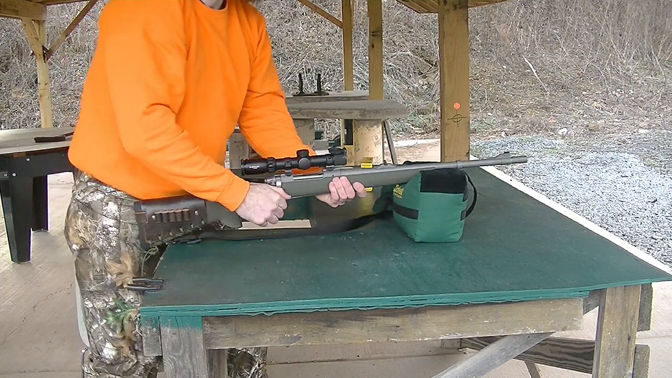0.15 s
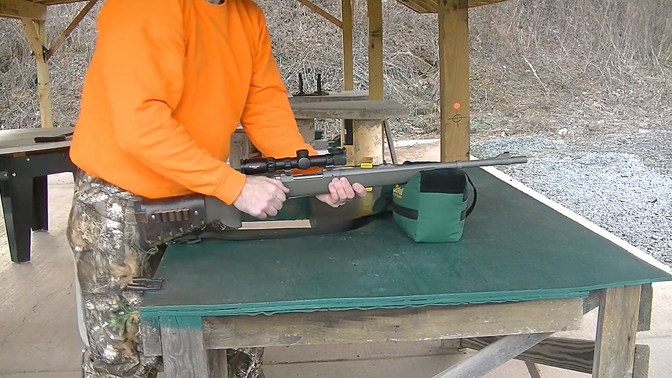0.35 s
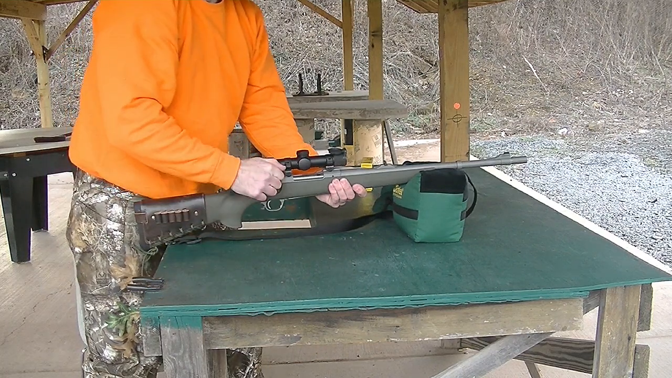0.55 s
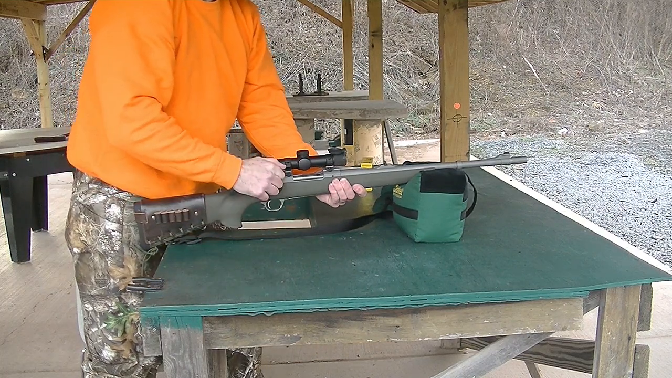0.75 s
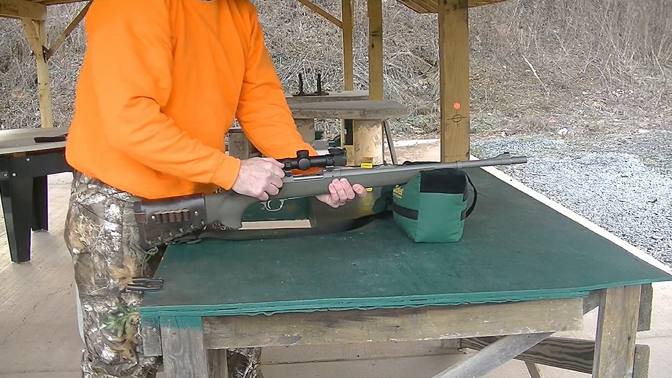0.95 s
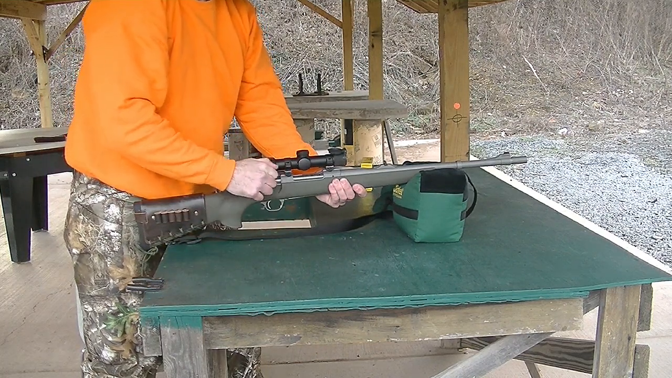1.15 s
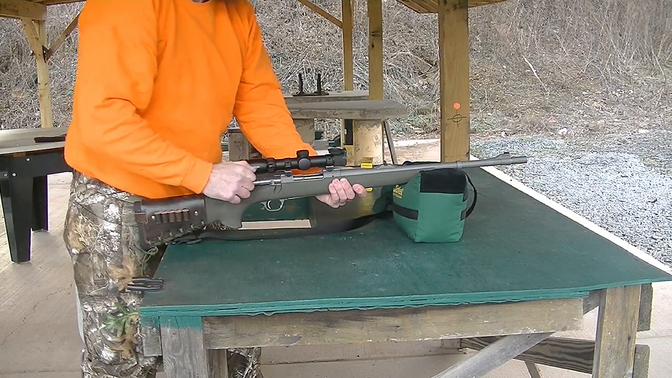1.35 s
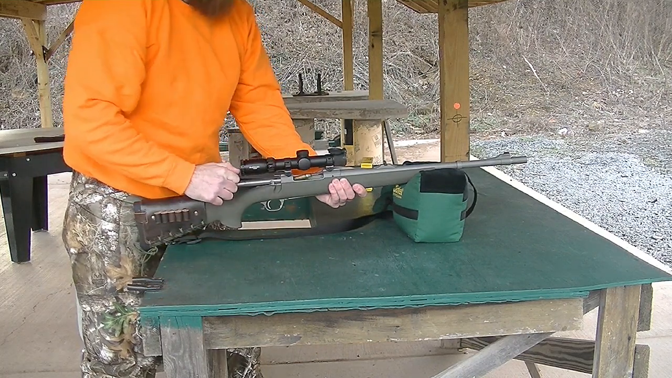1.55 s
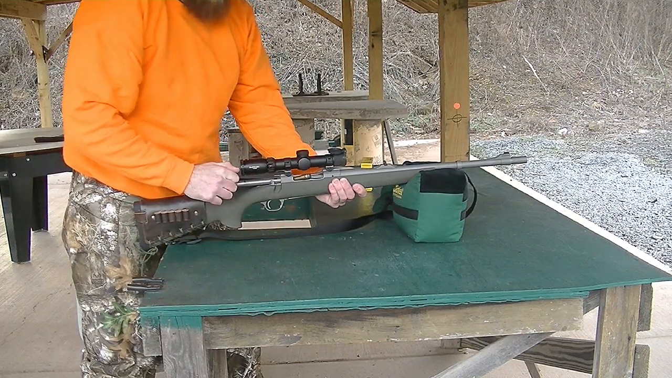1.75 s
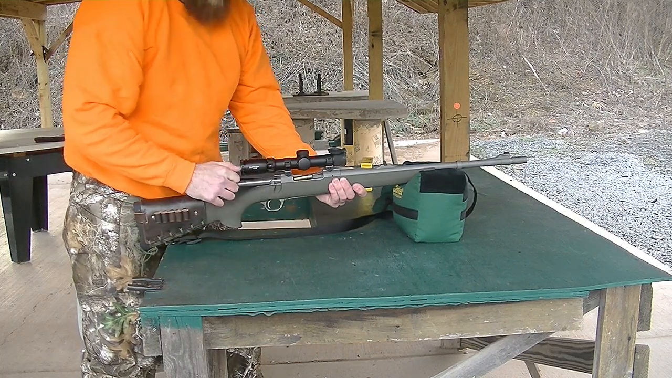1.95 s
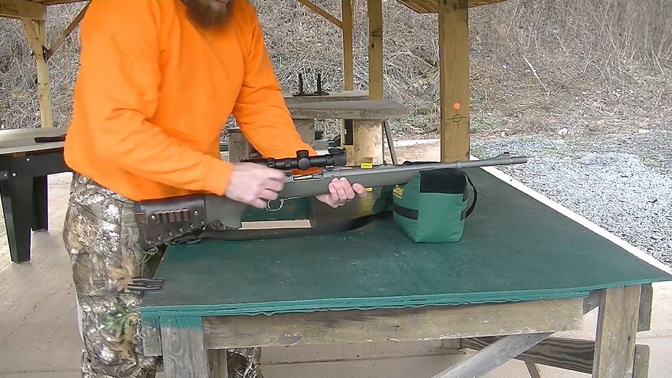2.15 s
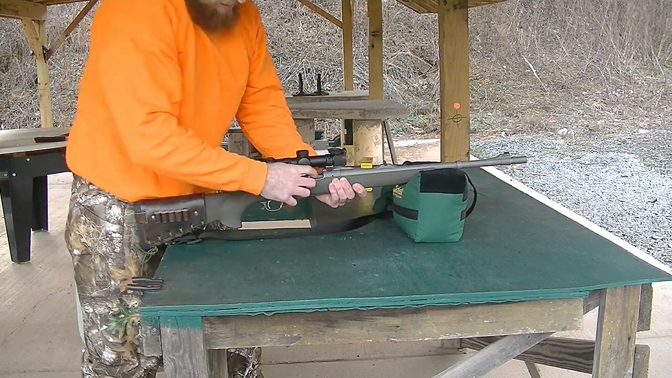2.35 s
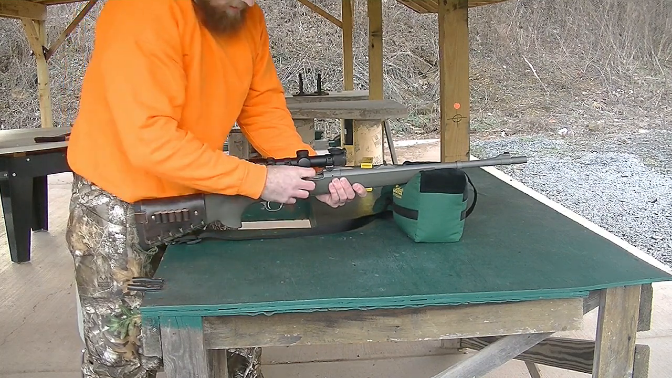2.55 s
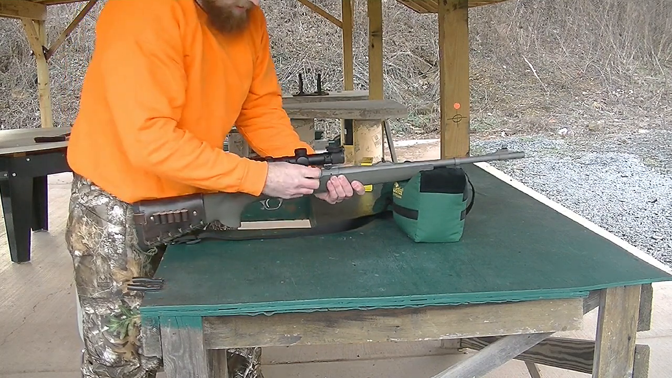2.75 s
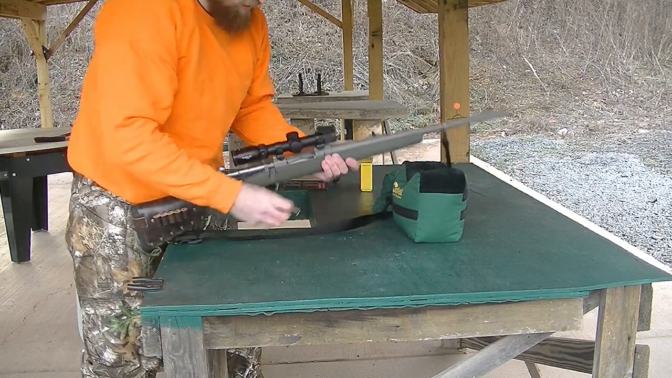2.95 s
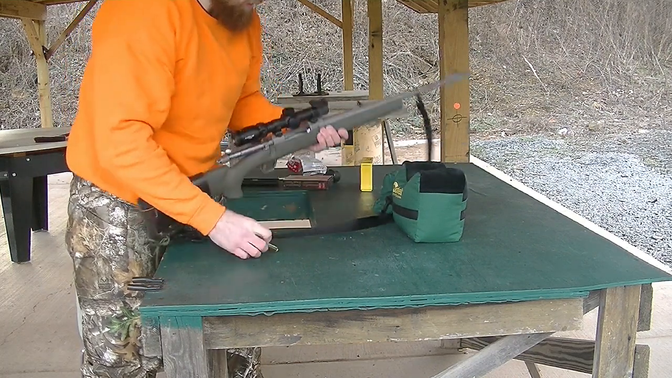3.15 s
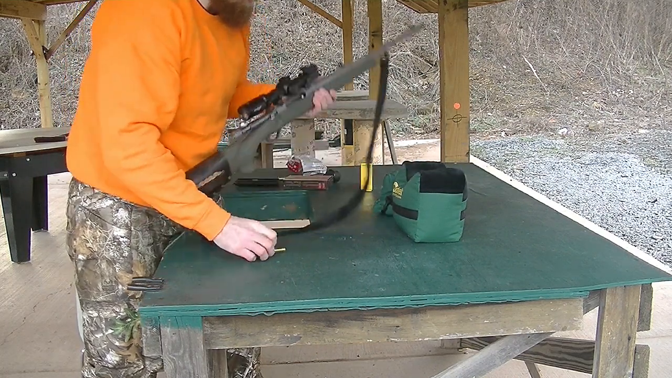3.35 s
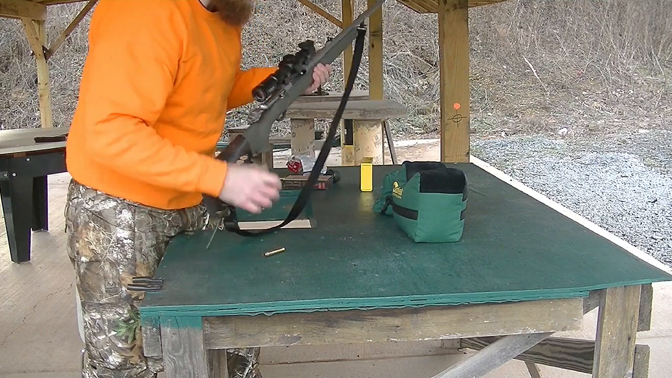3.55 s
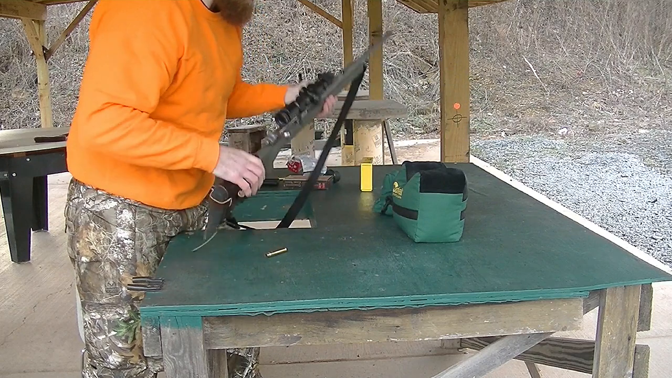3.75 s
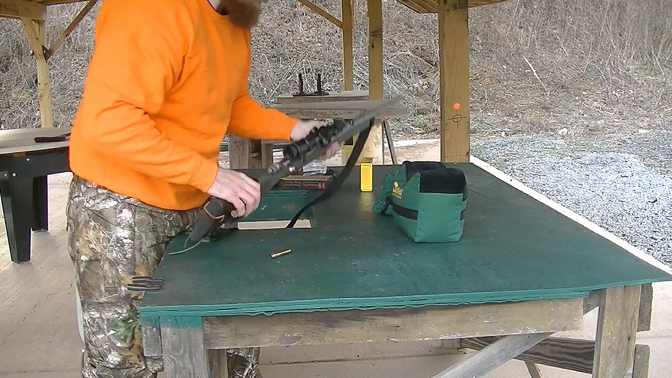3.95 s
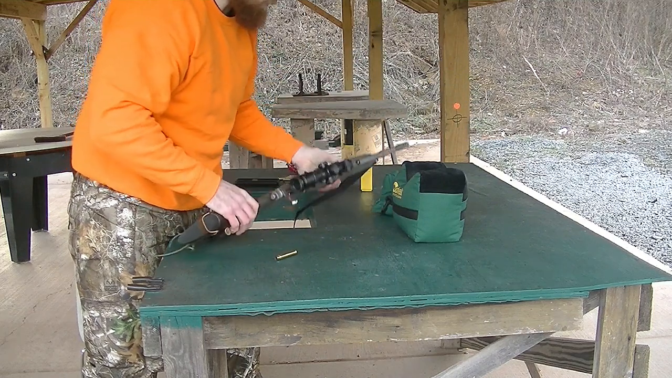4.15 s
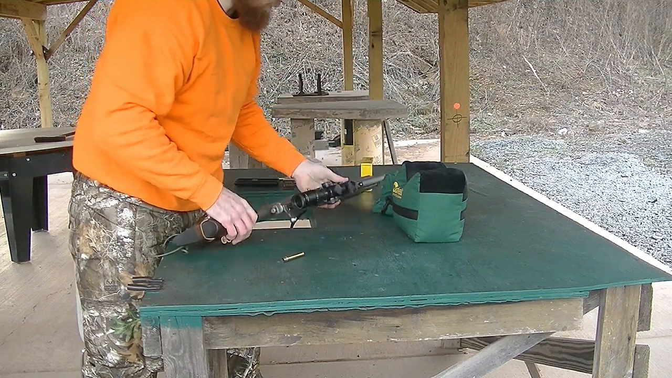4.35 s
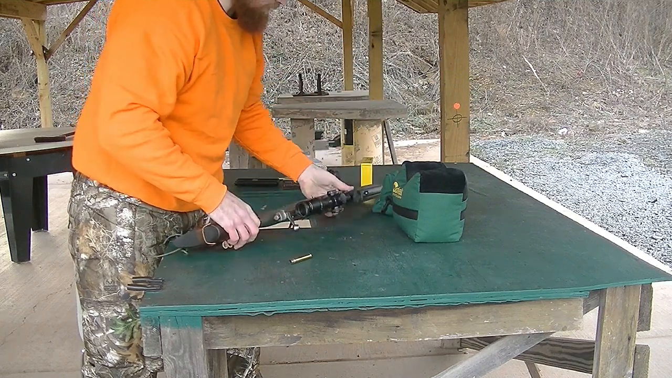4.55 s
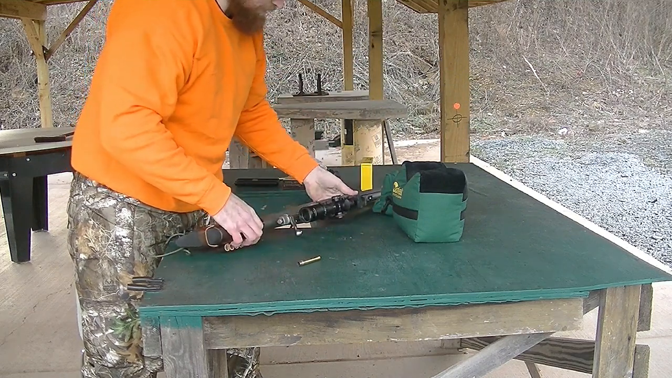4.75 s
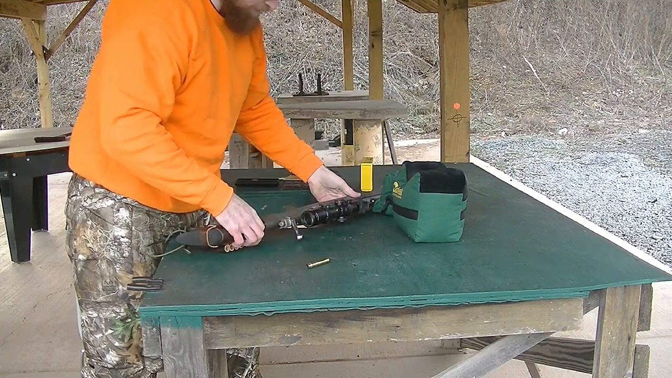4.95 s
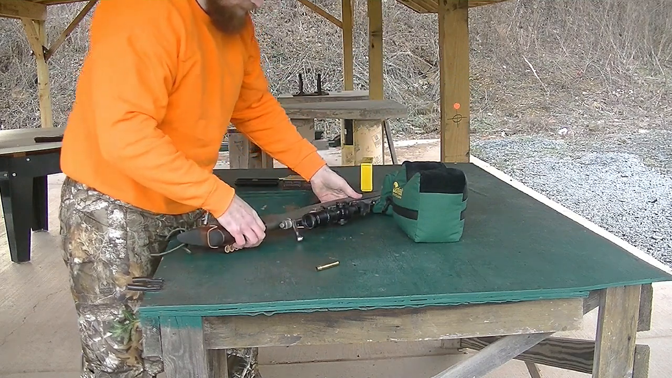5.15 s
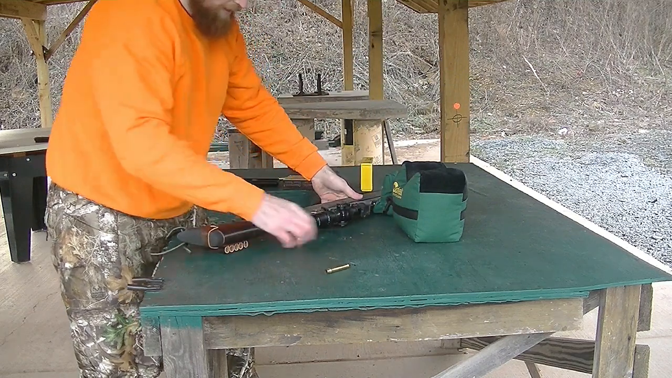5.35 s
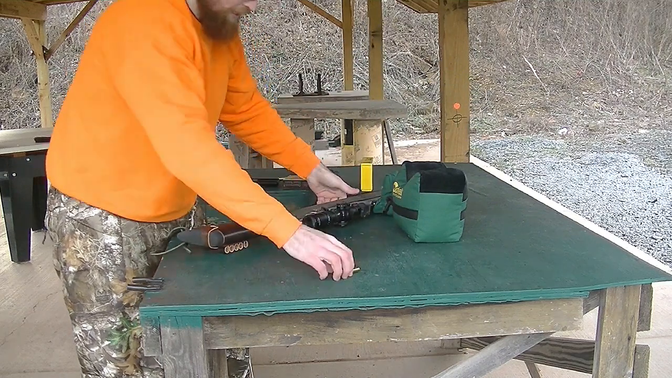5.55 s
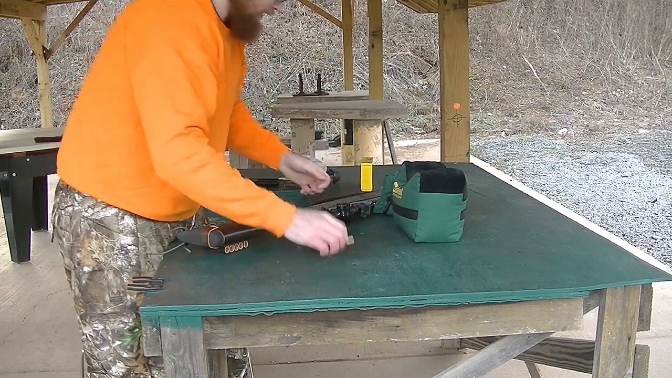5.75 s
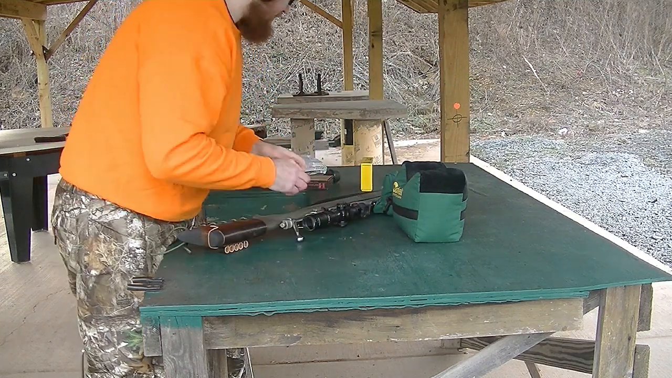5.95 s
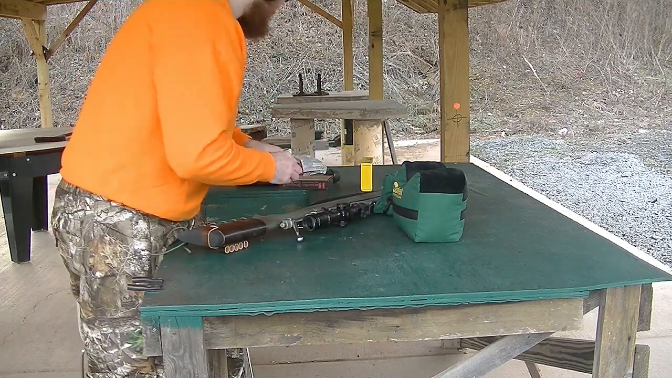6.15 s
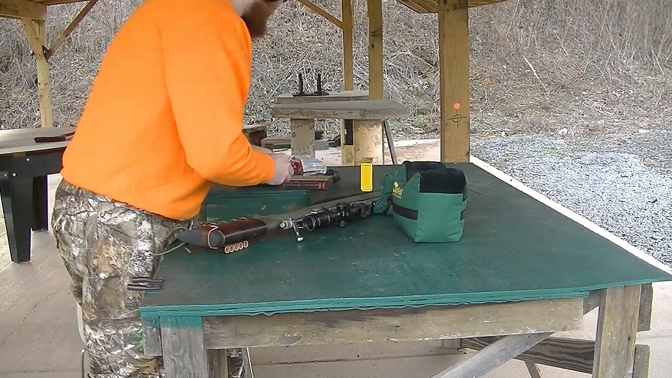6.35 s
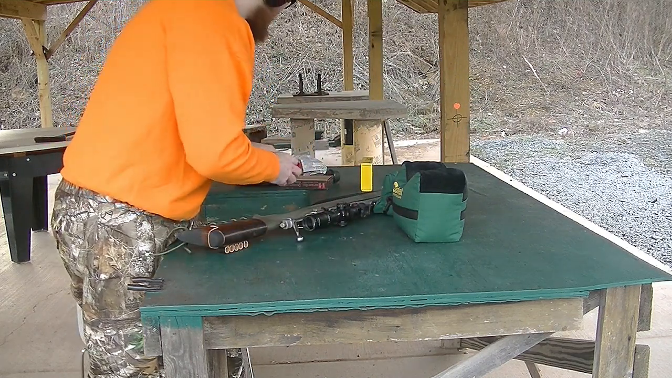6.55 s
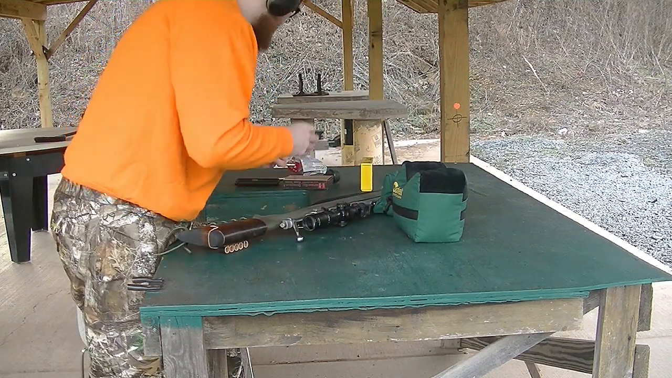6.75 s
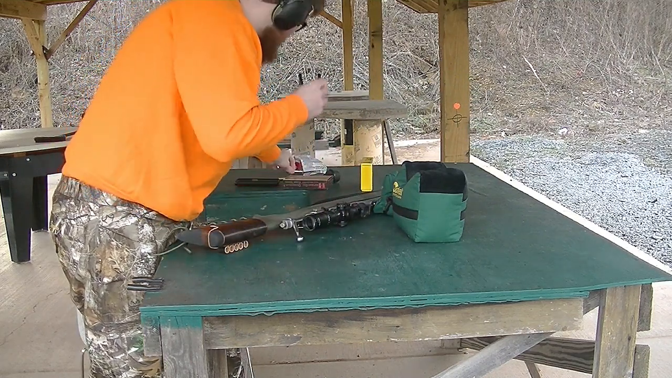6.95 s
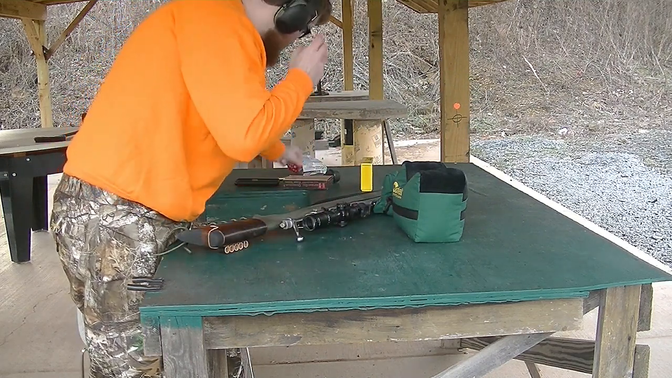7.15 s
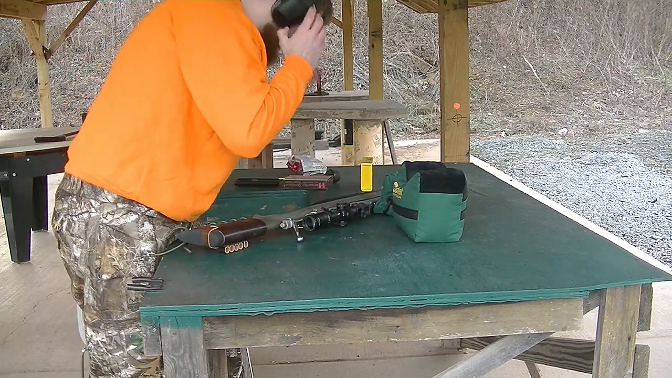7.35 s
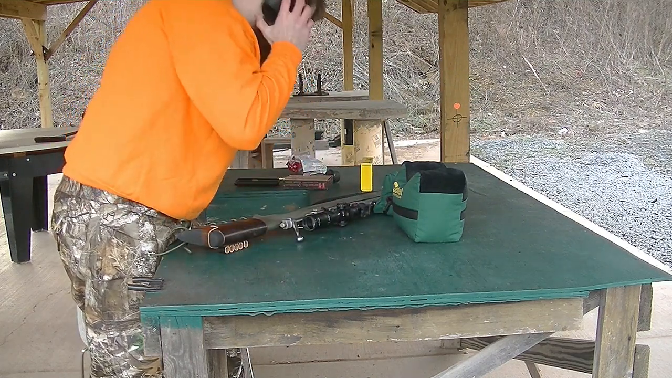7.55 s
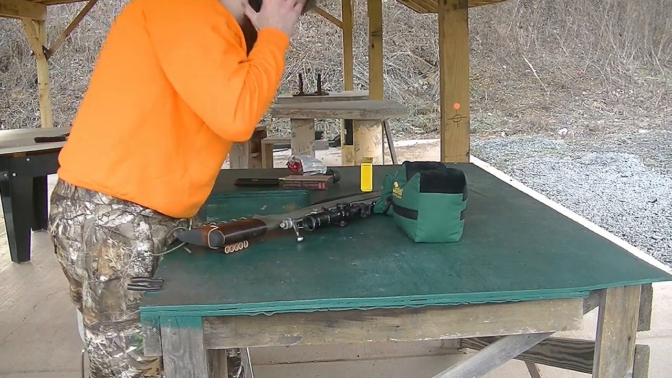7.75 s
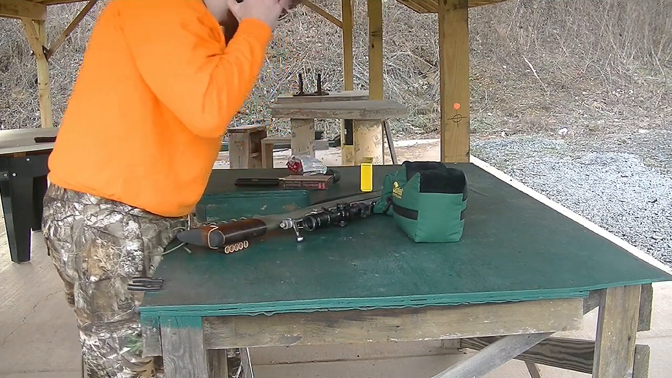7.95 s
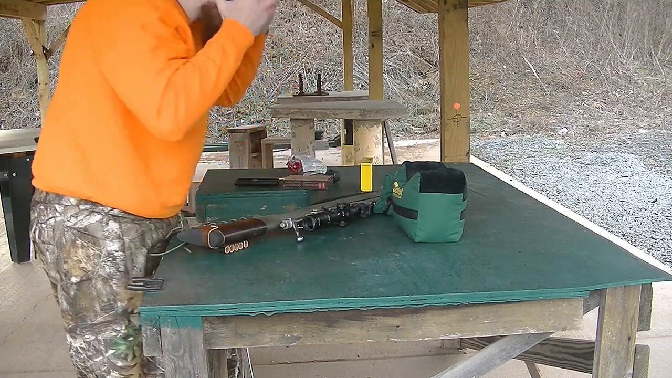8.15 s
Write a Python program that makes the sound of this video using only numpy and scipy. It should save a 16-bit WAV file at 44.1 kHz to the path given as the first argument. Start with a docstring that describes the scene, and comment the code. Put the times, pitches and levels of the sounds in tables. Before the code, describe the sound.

A wide, soft outdoor wash with microphone hiss runs throughout. From 0 to 0.8 s a camera lens motor purrs faintly in quick steps with light cloth rubbing, while small metallic ticks lead to a hard, bright double steel clack at about 0.55 s. Quiet sliding and a duller clink near 1.28 s precede a second sharp clack at 1.62-1.67 s, with thin high metal rings and a short shelter echo. Lighter clicks come at 2.6 and 2.76 s. A brass case taps the wooden bench at 3.25 s; dry knocks, strap ticks and fabric rubs continue to 4.6 s, with more handling around 5.3-5.8 s. The lens purrs again near 3.6, 4.9 and 6.4 s, the last two preceded by a small click. At 7.14 s a farther rifle-like crack slaps and echoes, fading into air and a faint rub from 8 s.

```python
"""Cloth rubs softly and a camera's lens motor purrs; then steel clacks as a bolt-action rifle is cycled,
unloaded and laid on a wooden bench under a shooting range's roof. Late on, a crack like a small rifle slaps back.
Blows are impulses with chatter, filtered by the struck body and followed by random echo; fine high rings are
decaying sines, rubs are filtered grains, the lens steps in short tone bursts, and the air is filtered noise."""
import sys
import numpy as np
from scipy import signal
from scipy.fft import rfft, irfft, next_fast_len
from scipy.io import wavfile

SR = 44100
rng = np.random.default_rng(int(sys.argv[2]) if len(sys.argv) > 2 else 0)


def wrap_up_sound(samples):
    """Save the sound to the file named by the first command line argument, as 16-bit audio."""
    columns = np.atleast_2d(samples).T
    # keep every value between -1 and 1, then stretch to whole-number steps
    tamed = np.clip(columns, -1, 1)
    steps = np.round(tamed * 32767).astype(np.int16)
    wavfile.write(sys.argv[1], SR, steps)


N = 365656

# Steel strikes steel as the bolt is worked: start_s, level_db (over 3 ms), weight_db (below 2 kHz),
# part_hz (main resonance of the struck part), ring_db (relative to the blow)
STEEL_BLOWS = [(0.157, -45.5, -6, 2500, -20), (0.333, -43, 0, 2400, -20), (.374, -41, 2, 3250, -22),
               (.463, -27.5, -3.5, 4370, -25), (0.5383, -17.5, -2, 5950, -20), (0.547, -16, 2, 3900, -22),
               (0.5571, -11.5, 4, 3400, -16), (1.2212, -44.5, 9, 1490, -20), (1.2754, -31, 7, 1020, -8),
               (1.4826, -46, -3, 7000, -20), (1.6095, -29, -4, 5420, -27), (1.6203, -29, -4, 5400, -10),
               (1.6354, -27.5, -11, 5030, -17), (1.6425, -18.5, -19, 3400, 1),
               (1.6663, -16, -0.5, 3300, -22), (1.6697, -10.5, -3, 3400, -12), (1.9204, -41.5, 1, 3300, -4),
               (2.049, -39, -1.5, 1580, -20), (2.5868, -40, 4, 2690, -20), (2.6043, -36, -8, 3800, -11),
               (2.6265, -26, -3.5, 5500, -22), (2.7594, -25, 6, 2480, -13)]
HARD_DB, EDGE_PER_DB = -18.5, 0.36  # blows above this level gain treble, those below lose it, dB per dB
REBOUND_S, REBOUND_SPREAD, REBOUND_DB = .0075, .25, -8.5  # gap, its scatter as a share, change per bounce


def contacts(count=3):
    """Inelastic rebound: each blow repeats more weakly, and a harder contact is briefer and so brighter."""
    for s, db, weight_db, part_hz, _ in STEEL_BLOWS:
        gaps = REBOUND_S * (1 + REBOUND_SPREAD * rng.uniform(-1, 1, count))
        for k in range(count):
            level_db = db + k * REBOUND_DB
            edge_db = EDGE_PER_DB * (level_db - HARD_DB)
            yield s + gaps[:k].sum(), level_db, weight_db, edge_db, part_hz


# Spectral colour of the struck action: frequency_hz, density_db (per Hz)
ACTION_COLOUR = [(120, -66.5), (200, -36), (719, -25), (1100, -4), (1270, -9), (1580, -4), (2590, -4),
                 (2780, -5), (3730, -2.5), (4080, -3), (6110, -6), (7070, -11.5), (9300, -16.5),
                 (14200, -17), (15800, -31)]
# Broad resonances of the receiver: centre_hz, width_hz, level_db
RECEIVER_MODES = [(1167, 86, 1), (1680, 200, 0), (2865, 76, 5), (3820, 200, 3), (5480, 200, 0),
                  (6950, 470, 5.5)]


def receiver_colour(hz):
    """Body resonance: the receiver's broad peaks stand on the colour of the action."""
    return read(ACTION_COLOUR, hz) + bumps(RECEIVER_MODES, hz)


def action():
    """Impact excitation: bolt handle, lugs and catches strike the receiver."""
    return blows(contacts(), receiver_colour, chatter_s=0.0028, chatter_db=19, part_db=6.0,
                 wet_db=-3.5, t60_factor=1.066, early_s=0.017, early_db=2.5)


# Fine ringing modes, thin high tones after sharp sounds: mode_hz, level_db, t60_s
FINE_MODES = [(1105, -9, .16), (1660, -5, .27), (1950, -8, .25), (2853, -11, .23), (3130, -13, .25),
              (3330, 0, .055), (3575, -12, .22), (3720, -12, .22), (5322, -3, .33), (6870, -11, .35),
              (8150, -12, .3), (10258, -9, .22), (13643, -10, .24)]
# Thin rings heard on their own: start_s, level_db, centre_hz
LONE_PINGS = [(1.367, -37.5, 8150), (1.644, -19, 13640), (1.722, -25, 10255), (1.847, -41.5, 1690),
              (2.76, -35, 10255), (3.482, -44.5, 5325), (5.36, -35, 3580), (5.64, -50.5, 5325),
              (7.148, -29.5, 10000), (7.305, -50, 5325)]
RING_OCTAVES, RING_SPILL_DB = 0.49, -11.5  # spread about the blow's resonance, least share for every mode
PING_OCTAVES = .09


def fine_ring(rise_s=.0008, size=12288):
    """Modal synthesis: decaying sines waver at random; modes near each sound's centre pitch ring most."""
    out, t = np.zeros(N), np.arange(size) / SR
    struck = [(s, db + ring_db, part_hz, RING_OCTAVES, gain_of(RING_SPILL_DB))
              for s, db, _, part_hz, ring_db in STEEL_BLOWS]
    alone = [(s, db, centre_hz, PING_OCTAVES, 0) for s, db, centre_hz in LONE_PINGS]
    for s, db, centre_hz, octaves, spill in struck + alone:
        for hz, mode_db, t60 in FINE_MODES:
            reach = max(bell(hz, centre_hz, octaves), spill)
            if reach > .01:
                waver = gain_of(3 * wander(size, 35) * (1 - np.exp(-t / .02)))
                envelope = (1 - np.exp(-t / rise_s)) * decay(t, t60)
                tone = np.sin(2 * np.pi * hz * t)
                add(out, s, reach * gain_of(db + mode_db) * waver * envelope * tone)
    return signal.sosfilt(signal.butter(4, 800, "high", fs=SR, output="sos"), out)


# Spectral colour of the knocks and clicks: frequency_hz, density_db (per Hz)
KNOCK_COLOUR = [(88, -28), (150, -22.5), (828, -4.5), (1330, -2.5), (1700, 0.5), (2630, 2), (2900, -1.5),
                (3250, 4), (4660, -9.5), (5420, -5), (8550, -23), (10500, -33), (14000, -37)]
# Knocks on the bench, and dry clicks close by: start_s, level_db (over 3 ms),
# weight_db (below 2 kHz), part_hz (main resonance)
KNOCKS_AND_CLICKS = [(3.2445, -31, -2, 2730), (3.3835, -39.5, 1, 2410), (3.4743, -33, 6, 2400),
                     (3.5188, -35.5, 8, 1320), (3.9804, -30, -8, 3100), (4.1636, -46, 9, 2700),
                     (4.3127, -46.5, 12, 3640), (4.5098, -42, 4, 3440), (4.6213, -49, -1, 3300),
                     (5.3189, -33, -9, 1930), (5.6371, -41, 15, 2840)]
KNOCK_EDGE_DB = -1  # shelf on the treble
TICKS_FROM_S, TICKS_TO_S = 4.24, 4.38  # the sling's fittings tick at random in this span
TICK_DB, TICK_SPREAD_DB, TICK_WEIGHT_DB, TICK_HZ = -48, 2, 9, 2800


def bench_contacts(count=3):
    """Stratified random timing: one faint sling tick falls in each equal slot, beside the knocks and clicks."""
    slot_s = (TICKS_TO_S - TICKS_FROM_S) / count
    ticks = []
    for k, (when, force) in enumerate(rng.random((count, 2))):
        tick_s = TICKS_FROM_S + (k + when) * slot_s
        tick_db = TICK_DB + TICK_SPREAD_DB * (2 * force - 1)
        ticks.append((tick_s, tick_db, TICK_WEIGHT_DB, TICK_HZ))
    return [(s, db, weight_db, KNOCK_EDGE_DB, part_hz)
            for s, db, weight_db, part_hz in KNOCKS_AND_CLICKS + ticks]


# The planks answer weight with a dull rumble: start_s, level_db (before the envelope),
# centre_hz, spread_octaves, t60_s (a straight fade also ends each one)
PLANK_THUDS = [(3.246, -38.5, 755, 0.72, 0.22), (3.51, -43.5, 700, 0.55, 0.19), (4.8, -57, 596, 0.95, 3.1),
               (5.325, -46, 296, 0.29, 0.35), (5.52, -57, 450, 1, 2)]


def bench(size=32768):
    """Dense modal response: weight stirs many damped modes of the planks, beside brief knocks and clicks."""
    knocks = blows(bench_contacts(), lambda hz: read(KNOCK_COLOUR, hz), chatter_s=0.0025, chatter_db=19.0,
                   part_db=6, wet_db=-4.0, t60_factor=0.95, early_s=0.028, early_db=-3)
    planks, t = np.zeros(N), np.arange(size) / SR
    for s, db, hz, octaves, t60 in PLANK_THUDS:
        noise = rng.standard_normal(size)
        modes = evened(irfft(rfft(noise) * bell(bins(size), hz, octaves)))
        envelope = (1 - np.exp(-t / 0.0013)) * decay(t, t60) * (1 - t / t[-1])
        add(planks, s, gain_of(db) * modes * envelope)
    return knocks + planks


def cartridge(db=-33, ring_hz=2729, t60=.06, size=8192):
    """Single-mode ringing: the brass case sounds briefly when set down, at the first knock."""
    out, t = np.zeros(N), np.arange(size) / SR
    envelope = (1 - np.exp(-t / .0005)) * decay(t, t60)
    add(out, KNOCKS_AND_CLICKS[0][0], gain_of(db) * envelope * np.sin(2 * np.pi * ring_hz * t))
    return out


# Arrivals of the crack, direct and reflected: start_s, level_db (over 3 ms), weight_db (below 2 kHz)
CRACK_ARRIVALS = [(7.1387, -22.5, 11.5), (7.1423, -14.5, 0), (7.176, -26.5, -11), (7.221, -25, 2.5),
                  (7.2576, -27, 2.5)]
# Spectral colour of the crack: frequency_hz, density_db (per Hz)
CRACK_COLOUR = [(88, -47), (150, -37), (611, -15), (685, -19.5), (910, -5.5), (1020, -7), (1380, -5),
                (2540, -1.5), (3440, -3.5), (4930, -21.5), (6940, -18.5), (9400, -34), (10500, -29),
                (11100, -40), (14000, -46)]
CRACK_HZ, CRACK_EDGE_DB, DULLING_DB_PER_S = 1730, 3, 70  # resonance, first treble shelf, its loss with delay


def report():
    """Multipath propagation: a crack from farther off, mostly scatter, loses treble on longer paths."""
    first_s = CRACK_ARRIVALS[0][0]
    arrivals = [(s, db, weight_db, CRACK_EDGE_DB - DULLING_DB_PER_S * (s - first_s), CRACK_HZ)
                for s, db, weight_db in CRACK_ARRIVALS]
    return blows(arrivals, lambda hz: read(CRACK_COLOUR, hz), chatter_s=0.0037, chatter_db=19, part_db=3.0,
                 wet_db=1.2, t60_factor=1.21, early_s=0.024, early_db=-1.5)


# The bolt scrapes in its raceway: start_s, length_s, level_db (before stroke shape and mix),
# weight_db (below 2 kHz), part_hz (resonance of the rubbed part)
BOLT_SCRAPES = [(.531, 0.028, -27, 0, 1750), (1.083, .09, -52.5, 2, 2800), (1.2, .34, -51, 2.5, 1090),
                (1.39, 0.14, -51.5, 1, 3800), (1.56, 0.11, -48, -9, 5544), (1.659, .02, -19, -4, 3300),
                (1.825, 0.13, -50.5, -5, 3340), (2.525, 0.12, -49.5, 4, 3480),
                (2.705, 0.091, -46.5, -11, 4000)]
# Sleeve, sling and stock rub: the same columns, start_s, length_s, level_db, weight_db, part_hz
CLOTH_RUBS = [(0, 0.96, -57.5, 17, 1280), (3.005, 0.19, -49.5, -5, 3870), (3.33, 0.17, -47.5, 3.5, 2330),
              (3.46, 0.19, -45, -0.5, 1400), (3.735, 0.41, -48.5, -5, 3080), (4, 0.33, -54, 3, 2000),
              (4.66, .8, -56, 18, 1091), (5.28, 0.24, -48, 5.5, 3570), (5.485, .125, -45, 5.5, 2980),
              (5.62, .11, -47, 8, 1780), (5.66, .4, -58, 4, 1900), (8, 0.43, -55.5, -7, 2220)]
# Spectral colour of the rubbing: frequency_hz, density_db (per Hz)
CLOTH_COLOUR = [(150, -31), (400, -7.5), (900, -6.5), (1400, -7), (2000, -2.5), (3100, -0.5), (4500, -8.5),
                (5800, -6), (8000, -18), (15000, -32.5)]


def handling(steel_edge_db=4):
    """Friction: the bolt slides through the receiver, brighter when pushed harder; cloth and stock are duller."""
    def steel(hz, db):
        edge_db = steel_edge_db + EDGE_PER_DB * (db - HARD_DB)
        return receiver_colour(hz) + shelves(hz, 0, edge_db)

    cloth = lambda hz, db: read(CLOTH_COLOUR, hz)
    scrapes = rubbing(BOLT_SCRAPES, steel, part_db=7.0, clump_db=3.0)
    return scrapes + rubbing(CLOTH_RUBS, cloth, part_db=5.0, clump_db=1.64)


STROKE_RISE, STROKE_EDGE_DB = 0.22, -2  # peak as a share of the length, shelf on the treble


def rubbing(rows, colour, part_db, clump_db, size=40960):
    """Stick-slip: fibres and steel catch and slip in clumps, as dense small grains under each stroke."""
    out, hz, t = np.zeros(N), bins(size), np.arange(size) / SR
    for start, length, db, weight_db, part_hz in rows:
        slips = rng.random(size) < 7000 / SR  # 7000 grains a second on average
        grains = rng.standard_normal(size) * slips * gain_of(clump_db * wander(size, 90))
        stroke = np.interp(t / length, [0, STROKE_RISE, 1], [0, 1, 0]) ** 0.44
        resonance_db = part_db * bell(hz, part_hz, 0.075)
        colour_db = colour(hz, db) + shelves(hz, weight_db, STROKE_EDGE_DB) + resonance_db
        add(out, start, gain_of(db) * stroke * evened(causal(grains, colour_db)))
    scatter = echo(t60_factor=0.59, early_s=0.024, early_db=4)
    mid, side = gain_of(-10.0) * signal.fftconvolve(out[None], scatter, axes=1)[:, :N]
    return gain_of(-2) * out + mid + gain_of(-8.0) * np.array([side, -side])


# Moves of the lens motor: first_step_s, end_s, level_db (of all its parts together)
LENS_MOVES = [(.031, .8, 0), (3.564, 3.97, -1.5), (4.862, 5.3, 0.5), (6.332, 6.77, -1)]
STEPS_PER_S = 30
# Spectral colour of the gears' rattle: frequency_hz, density_db (per Hz)
GEAR_COLOUR = [(150, -16), (280, -1.5), (480, 1.5), (800, -10), (1300, 2.5), (1650, -6), (2000, -4),
               (2600, -11.5), (6000, -31)]
# Clicks of the lens mechanism ahead of a move: start_s, level_db (over 3 ms)
LENS_MECHANISM = [(4.8225, -34.5), (6.2913, -34.5)]
LENS_CLICK_HZ = 1600
# Broad resonances of the lens barrel: centre_hz, width_hz, level_db
BARREL_MODES = [(1554, 140, 4.5), (1950, 180, -1.5), (2700, 380, -14), (3550, 670, -19.5)]


def lens(whine_hz=5812, whine_db=-60, hum_db=-59, gears_db=-55, step_s=.019, hum_s=0.029, size=2048):
    """Stepped excitation: each step is a hum, its third harmonic and gear rattle; clicks precede some moves."""
    out, t = np.zeros(N), np.arange(size) / SR
    swell = lambda length_s: np.sin(np.pi * np.clip(t / length_s, 0, 1))
    tone = lambda hz, phase: np.sin(2 * np.pi * hz * t + phase)
    for first, last, db in LENS_MOVES:
        for s in np.arange(first, last, 1 / STEPS_PER_S):
            phase, swing = rng.uniform(0, 2 * np.pi, 2), rng.uniform(-1.24, 1, 3)
            whine = gain_of(whine_db) * swell(step_s) * tone(whine_hz, phase[0])
            hum = gain_of(hum_db + 2.3 * swing[0]) * swell(hum_s) * tone(whine_hz / 3, phase[1])
            rattle = evened(causal(rng.standard_normal(size), read(GEAR_COLOUR, bins(size))))
            rattle *= gain_of(gears_db + 3.5 * swing[1]) * swell(step_s * np.exp(0.27 + 0.49 * swing[2]))
            add(out, s - step_s / 2, gain_of(db) * (whine + hum + rattle))

    def barrel(hz):
        return 20 * np.log10(sum(gain_of(db) / (1 + (2 * (hz - f) / width) ** 2)
                                 for f, width, db in BARREL_MODES))

    clicks = [(s, db, 0, 0, LENS_CLICK_HZ) for s, db in LENS_MECHANISM]
    return out + blows(clicks, barrel, chatter_s=0.0037, chatter_db=6, part_db=-3.0,
                       wet_db=-25, t60_factor=.6, early_s=.01, early_db=6)


# Spectral colour of outdoor air and microphone hiss: frequency_hz, density_db (per Hz)
AIR_COLOUR = [(12, -50), (20, -29.5), (98, -13.5), (247, -3), (326, -5.5), (355, -0.5), (419, -5),
              (482, -3.5), (754, -7), (1320, -10.5), (2430, -10), (3800, -10), (4760, -10), (12300, -16),
              (15800, -20)]
AIR_DB = -58.5  # level of the mid signal
# Stereo width of the air: frequency_hz, side_minus_mid_db
AIR_WIDTH = [(60, 9), (130, 5), (290, 5), (640, 2.5), (1410, 4), (3100, -2.5), (6820, -7.5), (15000, -46)]
# Stereo balance of the air: frequency_hz, left_minus_right_db
AIR_LEAN = [(60, 0.5), (180, 0.67), (550, 2.5), (1650, -0.5), (4970, 0.3), (15000, -0.5)]


def air(swell_db=1.06):
    """Filtered noise: an outdoor wash over microphone hiss; its low end is wide and swells a little."""
    size = next_fast_len(N, real=True)
    hz = bins(size)
    mid, side = rfft(rng.standard_normal((2, size))) * gain_of(read(AIR_COLOUR, hz))
    side = side * gain_of(read(AIR_WIDTH, hz))
    lean = gain_of(read(AIR_LEAN, hz) / 2)
    stereo = np.array([(mid + side) * lean, (mid - side) / lean])
    stereo = stereo * gain_of(AIR_DB) / np.std(irfft(mid, size))
    low = 1 / (1 + (hz / 1200) ** 2)
    swelling = irfft(stereo * low, size) * gain_of(swell_db * wander(size, 3.05))
    steady = irfft(stereo * (1 - low), size)
    return (swelling + steady)[:, :N]


def blows(rows, colour, chatter_s, chatter_db, part_db, wet_db, t60_factor, early_s, early_db, size=4096):
    """Source-filter impact: an impulse and brief chatter pass through the struck body, then its echo follows."""
    left, right, hz, t = np.zeros(N), np.zeros(N), bins(size), np.arange(size) / SR
    for s, db, weight_db, edge_db, part_hz in rows:
        body_db = colour(hz) + shelves(hz, weight_db, edge_db) + part_db * bell(hz, part_hz, 0.17)
        impulse = signal.unit_impulse(size)
        chatter = rng.standard_normal(size) * np.exp(-t / chatter_s)
        force = impulse + gain_of(chatter_db) * chatter / np.linalg.norm(chatter)
        strength = gain_of(db) * np.sqrt(.003 * SR / size)  # the energy of 3 ms at this level
        direct = strength * evened(causal(force, body_db))
        ring = strength * gain_of(wet_db) * evened(causal(impulse, body_db))
        mid, side = signal.fftconvolve(ring[None], echo(t60_factor, early_s, early_db), axes=1)
        mid[:size] += direct
        side *= gain_of(-11.5)
        add(left, s, mid + side)
        add(right, s, mid - side)
    return np.array([left, right])


# Decay of the shelter's echo: centre_hz, t60_s (before each source's own factor)
SHELTER_DECAY = [(250, 0.42), (1000, 0.28), (3500, 0.3), (7000, 0.25), (14000, 0.18)]


def echo(t60_factor, early_s, early_db, size=16384):
    """Diffuse reverberation: bench and posts scatter, then the roof's tail; new random mid and side each call."""
    t, hz = np.arange(size) / SR, bins(size)
    signs = rng.choice([-1., 1.], (2, size))
    taps = rfft(signs * (rng.random((2, size)) < .15))
    centres, t60s = np.transpose(SHELTER_DECAY)
    tail = np.zeros((2, size))
    for band, t60 in zip(np.eye(len(centres)), t60s):  # each band dies at its own speed
        tail += irfft(taps * np.interp(hz, centres, band), size) * decay(t, t60_factor * t60)
    tail *= np.clip((t - .003) / 0.0038, 0, 1) * (1 + gain_of(early_db) * np.exp(-t / early_s))
    return tail / np.linalg.norm(tail[0])


def causal(x, db):
    """Minimum-phase filtering: a gain curve colours x with nothing ahead of the attack."""
    log_gain = np.log(gain_of(np.maximum(db, db.max() - 100)))
    circle = np.concatenate([log_gain, log_gain[-2:0:-1]])
    return irfft(rfft(x) * np.exp(np.conj(signal.hilbert(circle)))[:len(db)])


def shelves(hz, weight_db, edge_db, low_hz=2000, high_hz=6500):
    """Shelving: heavy contacts add low range and hard ones add treble, in dB."""
    below = lambda corner_hz: 1 / (1 + np.square(np.square(hz / corner_hz)))
    return weight_db * below(low_hz) + edge_db * (1 - below(high_hz))


def bumps(resonances, hz):
    """Resonance: peaks stand out of a broad spectrum, in dB."""
    return sum(db / (1 + (2 * (hz - f) / width) ** 2) for f, width, db in resonances)


def bell(hz, centre_hz, octaves):
    """Gaussian weighting on the pitch axis: 1 at its centre, with octaves as standard deviation."""
    return np.exp(-.5 * (np.log2((hz + 1) / centre_hz) / octaves) ** 2)


def decay(t, t60):
    """Exponential damping: the level falls 60 dB in t60 seconds."""
    return np.exp(-np.log(1000) * t / t60)


def wander(size, rate_hz):
    """Low-pass noise: random drift of rms 1, mostly slower than rate_hz."""
    return evened(irfft(rfft(rng.standard_normal(size)) / (1 + (bins(size) / rate_hz) ** 4), size))


def gain_of(db):
    """Logarithmic level: decibels to amplitude."""
    return np.exp(np.asarray(db) * (np.log(10) / 20))


def evened(x):
    """Mean power: scales to rms 1."""
    return x / np.sqrt(np.mean(x ** 2) + 1e-20)


def read(points, hz):
    """Interpolation on the pitch axis: reads a table of (Hz, value) along log frequency."""
    f, value = np.transpose(points)
    return np.interp(np.log(hz + 1), np.log(f + 1), value)


def bins(size):
    """Discrete spectrum: the frequencies for this many samples."""
    return np.fft.rfftfreq(size, 1 / SR)


def add(mix, s, sound):
    """Superposition: adds a sound into the mix at s seconds, cut at the ends."""
    start = round(s * SR)
    part = mix[max(start, 0):][:len(sound) + min(start, 0)]
    part += sound[max(-start, 0):][:len(part)]


def scene():
    """Level panning: the near sounds lean left, most plainly in the low mids; the air has its own balance."""
    near = action() + fine_ring() + bench() + cartridge() + report() + handling() + lens()
    size = next_fast_len(N, real=True)
    lean = gain_of((.7 + 4.1 * bell(bins(size), 680, 0.81)) / 2)
    return irfft(rfft(near, size) * np.array([lean, 1 / lean]), size)[:, :N] + air()


EDGE_HZ = 15750


def record(dry, ceiling=1.0):
    """Soft saturation and band limiting: the recorder rounds the tallest peaks, then cuts above EDGE_HZ."""
    rounded = dry / (1 + (dry / ceiling) ** 4) ** .25
    band_limit = signal.firwin(511, EDGE_HZ, window=("kaiser", 9), fs=SR)
    return signal.oaconvolve(rounded, band_limit[None], "same")


dry = scene()
out = record(dry)
wrap_up_sound(out)
```